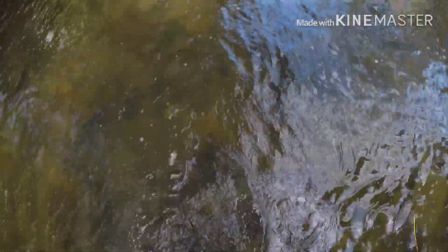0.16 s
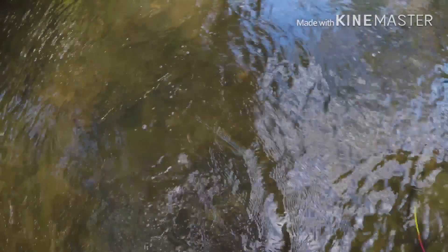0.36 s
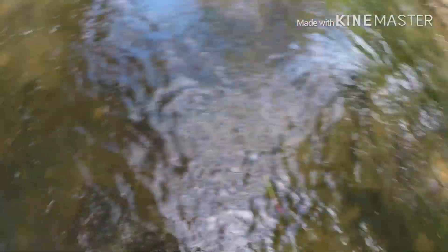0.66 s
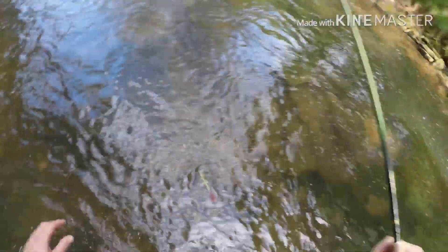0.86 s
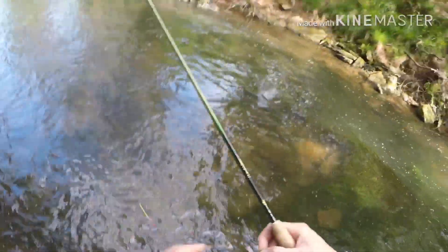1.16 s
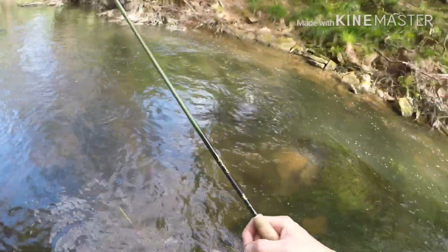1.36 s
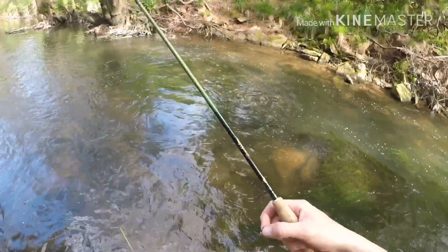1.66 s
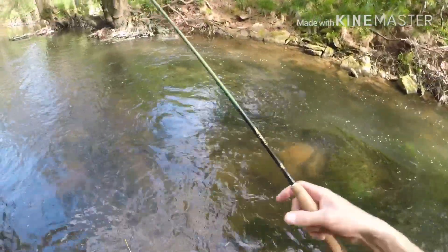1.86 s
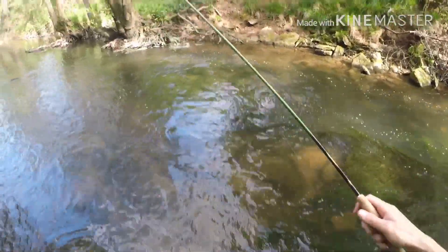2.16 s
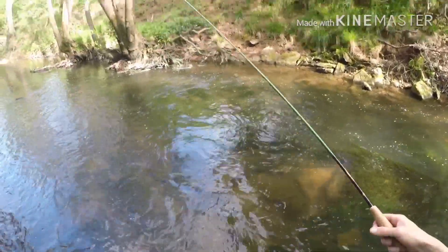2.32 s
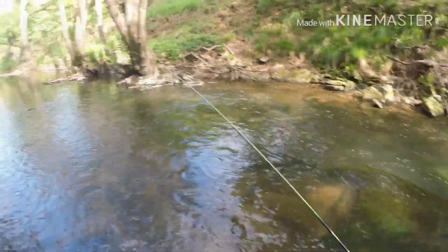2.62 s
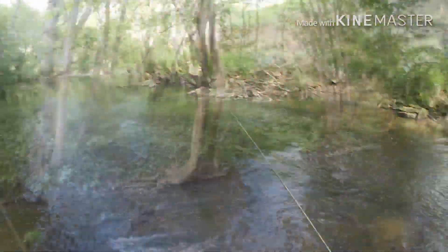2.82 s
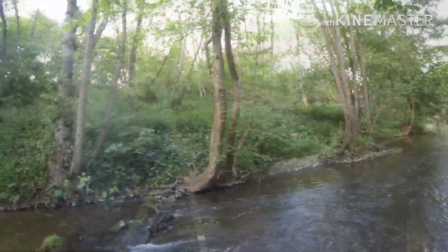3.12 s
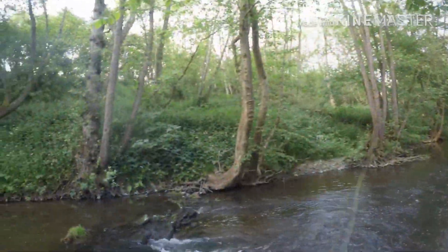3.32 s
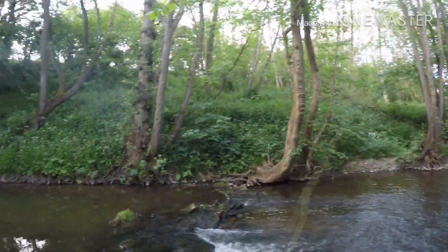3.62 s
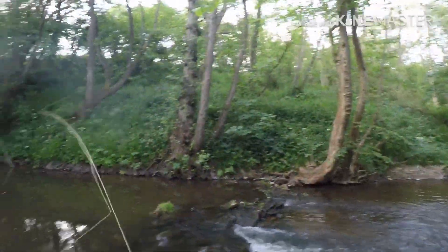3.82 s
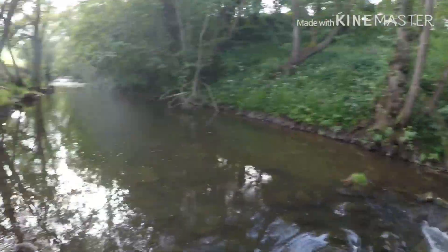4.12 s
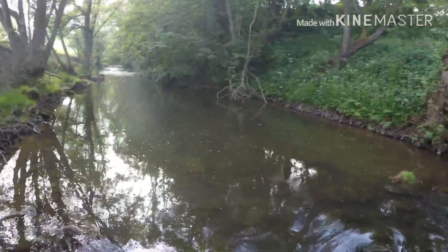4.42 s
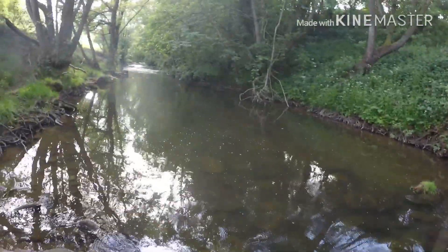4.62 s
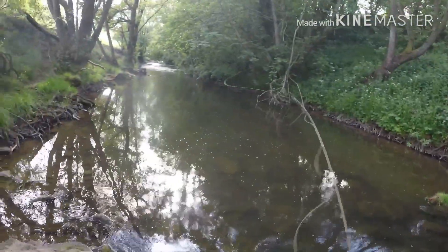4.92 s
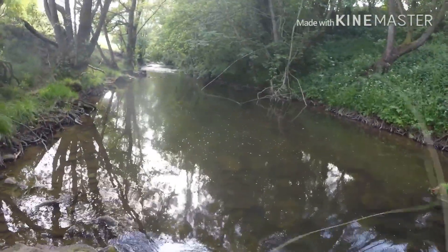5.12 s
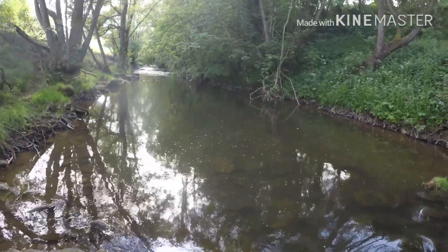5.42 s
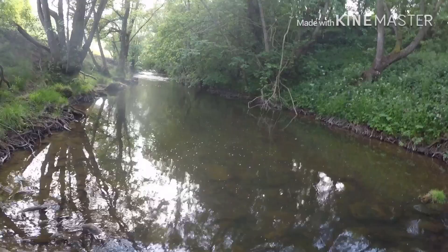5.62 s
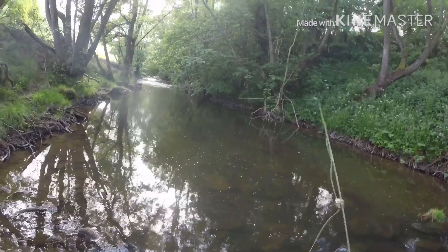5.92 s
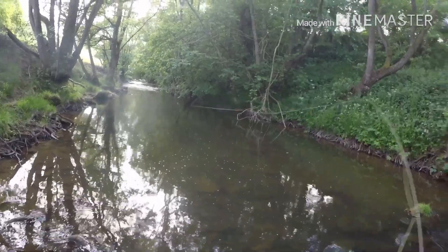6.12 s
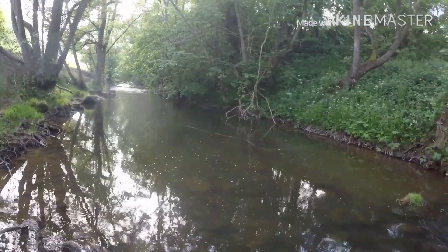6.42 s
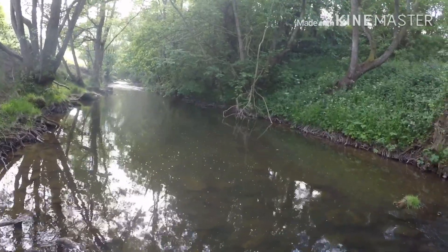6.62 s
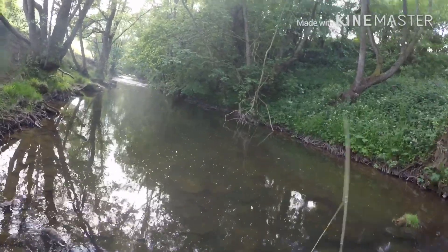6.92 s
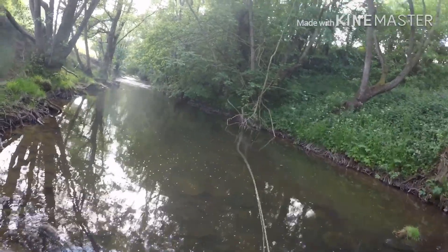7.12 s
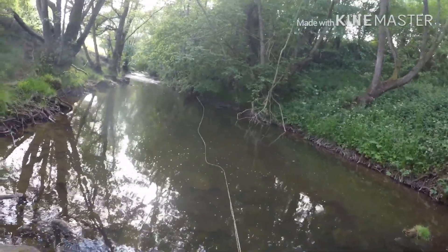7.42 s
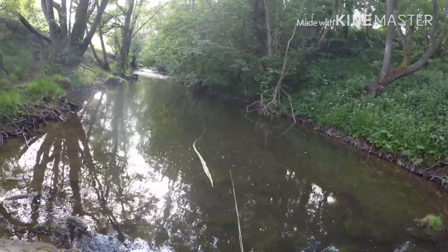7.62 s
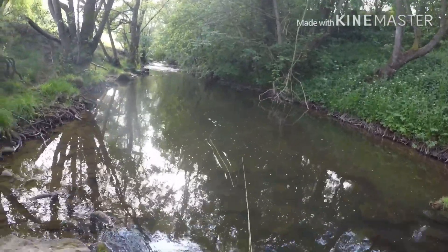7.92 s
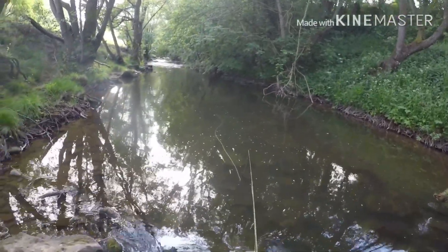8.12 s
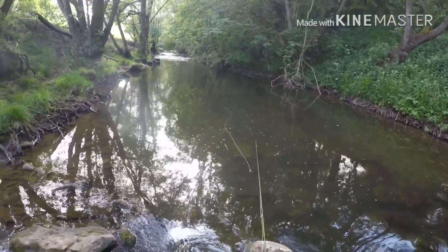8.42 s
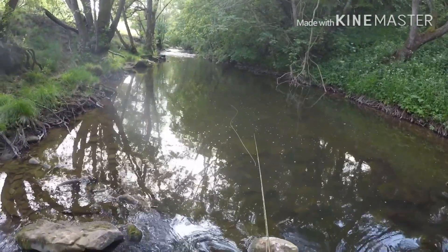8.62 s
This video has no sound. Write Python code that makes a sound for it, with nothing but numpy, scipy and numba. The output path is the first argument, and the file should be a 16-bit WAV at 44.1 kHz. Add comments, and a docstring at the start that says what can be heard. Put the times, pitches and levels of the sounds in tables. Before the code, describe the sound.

From 0 s a shallow river churns beside a pool: a dense, low-mid roar of bubbles with fine babble and a weak hiss, and a very faint low rumble of moving air. Deep gulps and small plinks show at 0.1-0.45 s, more gulps near 0.7-0.8 s. The tone brightens slightly from 0.7 to 1.3 s as the microphone turns. A far bird gives short thin notes near 1.8 kHz at 1.26 and 2.03 s, then a longer falling whistle at 2.17-2.75 s, cut off by an abrupt level drop at 2.57 s. The water swells back smoothly to full by 3.55 s, now a riffle. Until about 9 s the rush stays steady, with gentle surges, hollow plops, deep gulps, brief sliding gurgles, light droplet ticks and a small spray puff at 4.9 s. Close, outdoor, wide stereo, mostly louder right.

```python
"""A shallow river churns and hisses over stones beside a pool, where a far bird whistles.
Then the level drops and swells back beside the riffle, with gulps, sliding gurgles and ticks.
Bubbles are damped sines over filtered noise; gurgles and whistles are sliding tones; droplets are noise ticks.
Two close microphone ports hear much of the low water in nearly opposite phase, mostly louder on the right.
A faint low rumble of moving air lies underneath."""
import sys
import numpy as np
from scipy import signal
from scipy.fft import rfft, irfft, next_fast_len
from scipy.io import wavfile
from scipy.ndimage import uniform_filter1d, minimum_filter1d, map_coordinates
from numba import njit

SR = 44100
rng = np.random.default_rng(int(sys.argv[2]) if len(sys.argv) > 2 else 0)


def to_wav(sig):
    """Store sig (one row per channel, or 1-D mono) as 16-bit WAV at the path in sys.argv[1].

    Samples outside -1..1 are clipped; the rate is SR.
    """
    pcm = np.clip(np.atleast_2d(sig), -1, 1) * 32767
    pcm = np.round(pcm).astype(np.int16)
    wavfile.write(sys.argv[1], SR, pcm.T)  # frames by channels


N = 386301

# Levels in the tables are those before the ports and the final gain control.
# Colour of the water. Each row: frequency in Hz, pool strength in dB, riffle strength in dB (both relative).
WATER_COLOUR = [(127.3, -16, -25.5), (174, 0.5, -6.5), (223, 1, -3), (328, -1.5, -3), (433, -1, 1.5),
                (568, -0.3, 0.94), (789, -6.5, -4.5), (1167, -18, -14), (1460, -23, -19.5),
                (1950, -29, -24), (2320, -39.5, -32), (2720, -41, -37.5), (3200, -37.5, -37.5),
                (3560, -38.5, -35.5), (4070, -45.5, -44.5), (5640, -42.5, -40.5), (7620, -39.5, -37.5),
                (10200, -45, -43.5), (11900, -50.5, -51), (13500, -60, -58)]
# The two spots, pool then riffle. Each row: level of the churn in dB, of the babble in dB, of the spray in dB.
SPOT_LEVELS = [(-14.5, -30, -43), (-16.5, -29.5, -43.5)]
# Typical random drift in dB, in the order churn, babble, spray.
LAYER_DRIFT_DB = (.6, .25, .2)
# Waves breaking harder or softer. Each row: middle in seconds, churn lift in dB, spray lift in dB.
WAVE_SURGES = [(.22, -0.5, 1), (2.3, 0.8, 1), (3.65, 0.8, 1), (4.25, 0, .8), (4.9, 0.8, .8), (7.17, 0.7, 1),
               (7.75, 1, 1.3), (8.5, 0, 1)]
SURGE_S = 0.25  # time from the middle until the lift falls to about a third
# The microphone swings toward the white water, once per spot. Each row: start in seconds, end in seconds.
MICROPHONE_TURNS = [(.66, 1.27), (3.25, 4.25)]
# Colour while it is turned away. Each row: frequency in Hz, pool change in dB, riffle change in dB.
TURNED_AWAY = [(700, 0.5, 0.5), (1400, -2, -2), (2210, -2, -1.5), (3400, -5.5, 1.5), (5600, -4, -1),
               (10000, -7.5, -5.5)]
# Small splashes that throw up spray. Each row: middle in seconds, lift in dB.
SPRAY_SPLASHES = [(3.93, 1.5), (4.92, 3.5), (5.82, 1.5), (6.04, 1), (7.34, 1)]
SPLASH_S = .03  # time from the middle until the lift falls to about a third
# Single bubbles, from gulps to small plinks. Each row: start in seconds, first pitch in Hz, level in dB.
SINGLE_BUBBLES = [(.118, 624, -13), (.13, 3300, -37), (.131, 1840, -28), (.146, 3480, -42),
                  (.157, 3200, -36), (.181, 1836, -24), (.225, 2450, -31.5), (.312, 2250, -30),
                  (.32, 169, -6), (.354, 2260, -33), (.446, 4200, -37), (.718, 330, -12), (.787, 343, -8),
                  (1.748, 189, -14), (3.602, 918, -12), (3.814, 1200, -15.5), (3.958, 1590, -19.5),
                  (4.063, 412, -6.5), (4.084, 2720, -28), (4.098, 2720, -28), (4.126, 1210, -13),
                  (4.249, 877, -12), (4.284, 3560, -35), (4.46, 808, -11), (4.612, 192, -9.5),
                  (4.943, 296, -10), (5.038, 193, -9), (5.149, 936, -7), (5.334, 800, -10),
                  (5.569, 818, -12), (5.897, 953, -9), (5.899, 1710, -23), (6.464, 248, -7.5),
                  (6.857, 680, -10), (6.981, 1410, -20), (7.143, 3300, -34), (7.215, 154.5, -6),
                  (7.459, 1630, -24), (7.487, 3400, -35), (7.885, 832, -12), (8.181, 680, -8.5),
                  (8.504, 205, -11), (8.593, 1060, -13)]
# Sliding notes of air cavities. Each row: start in seconds, length in seconds, first pitch in Hz,
# last pitch in Hz, level in dB; the pitches are those before the bulge and waver.
GURGLE_NOTES = [(3.79, .08, 385, 460, -23), (4.26, 0.085, 440, 399, -22), (4.75, .09, 470, 492, -22.5),
                (4.97, .1, 488, 540, -22.5), (5.188, 0.072, 350, 270, -21), (5.24, .06, 560, 574, -19.5),
                (5.66, .11, 320, 469, -23), (5.891, .08, 470, 412, -20.5), (6.21, 0.082, 440, 500, -21),
                (6.884, 0.0677, 235, 430, -18.5), (6.96, .11, 320, 440, -21.5), (7.06, .075, 420, 250, -23),
                (7.159, 0.072, 290, 412, -23), (7.535, .06, 248, 484, -20), (7.59, 0.073, 417.5, 438, -18),
                (8.55, 0.088, 188.4, 311, -20.5)]
GURGLE_ARCH = 0.072  # share by which the pitch bulges upward midway
# Droplets landing close by. Each row: start in seconds, level in dB before the band filter.
DROPLET_TICKS = [(1.795, -24), (2.876, -31), (2.972, -27), (3.076, -30), (3.129, -23), (3.379, -33),
                 (4.005, -27), (5.182, -28), (5.317, -27), (5.438, -28), (5.819, -25), (5.913, -27.5),
                 (6.023, -29), (6.827, -28), (6.987, -25), (7.33, -27), (7.344, -24.5), (7.497, -24),
                 (7.835, -27), (7.894, -24), (8.048, -28), (8.557, -29)]
# The bird's thin notes. Each row: start in seconds, length in seconds, top pitch in Hz, level in dB.
BIRD_NOTES = [(1.262, 0.076, 1814, -35.5), (2.035, 0.087, 1810, -33.5), (2.166, 0.58, 1820, -37.5)]
SCOOP_HZ, SCOOP_S = 55, 0.023  # a note starts this far below its top and climbs at this pace
HOLD_S, SAG_HZ_PER_S = 0.1, 600  # after the hold, the pitch sags
TREES_T60_S, TREES_DB = 0.19, -12  # time for the trees' answer to fade by 60 dB, and its level
# Air stirring on the ports beside the pool. Each row: time in seconds, rumble level in dB.
AIR_RUMBLE = [(0.05, -46), (0.35, -54), (.65, -46), (1.15, -45), (2.35, -59)]
CALM_DB = -71  # typical rumble beside the riffle
# The microphone pair. Each row: frequency in Hz, left minus right in dB, left lead in radians,
# likeness of the two sides from 0 to 1.
PORT_PAIR = [(129, -4, 1.4, 0.9), (222, -5.5, -0.9, 1), (332, -10.5, -1, 0.95), (457, -15.5, -2, 1),
             (595, -10, -3, 1), (842, -3.5, -3.5, 0.96), (1173, -2, -3.5, 0.93), (2040, -2.5, -4.5, 0.83),
             (2520, -0.5, -4.5, 0.4), (2730, -1, -3, 0.27), (3310, -4.5, -4.5, 0.5),
             (3750, -10.5, -5.5, 0.65), (4440, -0.5, -9, 0.1), (5430, -5.5, -8.5, 0.34),
             (6940, -0.3, -9, 0.51), (7600, -1.2, -9.5, 0.24), (9150, 0, -11, 0.67), (11000, -2, -12, 0.24),
             (12500, -4.5, -18, 0.3)]
DROP_S, BACK_S, FULL_S = 2.572, 2.6, 3.55  # the level drops, the swell's ramp begins, full level
FADE_POWER = 1.11  # bend of the swell
TOP_HZ = 13550  # nothing is left from here up


def amp(db):
    """Turn decibels into a gain."""
    return 10 ** (np.asarray(db) / 20)


def unit(x):
    """Scale x to an average (rms) strength of 1."""
    return x / np.sqrt(np.mean(x ** 2) + 1e-20)


def along(rows, hz):
    """Read each column after the frequency, on a log frequency axis."""
    f, *columns = np.transpose(rows)
    return [np.interp(np.log(hz + 1), np.log(f), column) for column in columns]


def wobble(rate):
    """A smooth random curve through `rate` random points a second."""
    points = rng.standard_normal(int(N * rate / SR) + 4)
    return map_coordinates(points, [np.arange(N) * rate / SR])


def smooth(x, size):
    """Take two running means in a row."""
    return uniform_filter1d(uniform_filter1d(x, size=size), size=size)


def spectrum(x):
    """The frequencies and the spectrum of x, padded with silence."""
    length = 2 * next_fast_len(N // 2 + SR // 10, real=True)
    return np.fft.rfftfreq(length, 1 / SR), rfft(x, length)


def filtered(x, response):
    """Multiply the spectrum of x by a gain for each frequency."""
    hz, z = spectrum(x)
    return irfft(z * response(hz))[..., :N]


def band(hz, low_hz, high_hz, order=10):
    """A band-pass gain; neighbouring bands add up to nearly even power."""
    low_side = 1 + (low_hz / (hz + 1)) ** (2 * order)
    high_side = 1 + (hz / high_hz) ** (2 * order)
    return (low_side * high_side) ** -.5


def rush(patchy_db, size):
    """Two unrelated noises share patches of random gain across time and pitch."""
    z = signal.stft(rng.standard_normal((2, N)), nperseg=size)[2]
    across_pitch = uniform_filter1d(rng.standard_normal(z.shape[1:]), size=5, axis=0)
    patches = uniform_filter1d(across_pitch, size=9, axis=1)
    patchy = z * amp(patchy_db * unit(patches))
    return unit(signal.istft(patchy, nperseg=size)[1][:, :N])


@njit
def ring(times, pitches, gains, cycles, rise, onset):
    """Bubbles are soft-starting, damped sines that rise in pitch as they near the surface."""
    out = np.zeros((2, N))
    for i in range(len(times)):
        start = int(times[i] * SR)
        life = cycles[i] * SR / pitches[i]  # in samples
        for k in range(max(0, min(int(1.5 * life), N - start))):
            age = k / life
            turns = k * pitches[i] / SR
            wave = np.sin(2 * np.pi * turns * (1 + rise * age / 2))
            v = wave * np.exp(-3 * age) * (1 - np.exp(-turns / onset))
            out[0, start + k] += gains[0, i] * v
            out[1, start + k] += gains[1, i] * v
    return out


def cloud(rate, low_hz, high_hz, cycles, rise, onset, spread_db):
    """A random crowd of bubbles, `rate` a second, has even power per Hz; a few are much louder."""
    when, place, strength, bearing, life = rng.random((int(rate * N / SR), 5)).T
    hz = low_hz * (high_hz / low_hz) ** place
    gain = hz * amp(-spread_db * np.log(strength + .01))
    angle = 2 * np.pi * bearing
    gains = gain * np.array([np.cos(angle), np.sin(angle)])  # random share in the two parts of the field
    return unit(ring(when * N / SR, hz, gains, cycles * (.5 + life), float(rise), float(onset)))


def river():
    """Churn, babble and spray take each spot's colour and surges, duller while the microphone is turned away."""
    t = np.arange(N) / SR
    low_db, spray_db = sum(np.outer(lifts, np.exp(-((t - s) / SURGE_S) ** 2)) for s, *lifts in WAVE_SURGES)
    # Each layer: sound, surge in dB, low edge in Hz, high edge in Hz
    layers = [(churn(), low_db, 128, 1000),
              (babble(), (low_db + spray_db) / 2, 1000, 2500),
              (spray(), spray_db, 2500, SR / 2)]
    out = np.zeros((2, N))
    for spot, present in enumerate([t < DROP_S, t >= DROP_S]):
        water = np.zeros((2, N))
        for (layer, surge_db, low_hz, high_hz), db, drift_db in zip(layers, SPOT_LEVELS[spot], LAYER_DRIFT_DB):
            colour = lambda hz: amp(along(WATER_COLOUR, hz)[spot]) * band(hz, low_hz, high_hz, order=14)
            level_db = db + surge_db + drift_db * wobble(3.397)
            water += amp(level_db) * unit(filtered(layer, colour))
        dull = filtered(water, lambda hz: amp(along(TURNED_AWAY, hz)[spot]))
        facing = np.interp(t, MICROPHONE_TURNS[spot], [0, 1])
        out += present * (facing * water + (1 - facing) * dull)
    return out


def churn():
    """Pockets of air folded under behind the stones ring low and glide upward over a noise roar."""
    pockets = cloud(rate=450, low_hz=125.35, high_hz=1101.6, cycles=19.05, rise=0.357, onset=1.1, spread_db=0.5)
    roar = unit(filtered(rng.standard_normal((2, N)), lambda hz: band(hz, 60, 1170)))
    return unit(pockets + amp(1.5) * roar)


def babble():
    """A dense crowd of small bubbles pings as wavelets break, merging into a fine wash."""
    pings = cloud(rate=4200, low_hz=854.0, high_hz=2802, cycles=14.2, rise=0.081, onset=.9, spread_db=2.5)
    wash = unit(filtered(rush(patchy_db=.8, size=256), lambda hz: band(hz, 760, 2600)))
    tremble_db = 0.24 * wobble(14) + 1.2 * wobble(60)
    return unit(pings + amp(-.5) * wash) * amp(tremble_db)


def spray():
    """Foam crackles as tiny bubbles over a hiss, trembles finely and puffs up with each splash."""
    t = np.arange(N) / SR
    splash_db = sum(db * np.exp(-((t - s) / SPLASH_S) ** 2) for s, db in SPRAY_SPLASHES)
    crackle = cloud(rate=2200, low_hz=2310, high_hz=12900, cycles=4.9, rise=0.086, onset=0.31, spread_db=5.5)
    hiss = rush(patchy_db=0.96, size=256)
    tremble_db = 0.42 * wobble(17) + 0.63 * wobble(70)
    return unit(hiss + amp(-11.5) * crackle) * amp(splash_db + tremble_db)


def gulps():
    """The largest and nearest bubbles stand out singly; the higher ones ring for more cycles."""
    s, hz, db = np.array(SINGLE_BUBBLES, float).T.copy()
    gains = np.array([amp(db), np.zeros(len(s))])  # all in the common part of the field
    rings = ring(s, hz, gains, cycles=9 + hz / 70, rise=0.066, onset=0.56)
    return filtered(rings, lambda f: band(f, 154, 5000, order=14))


def gurgle():
    """Air cavities behind the stones shrink or widen, so each note slides along a shallow arch."""
    out, t = np.zeros((2, N)), np.arange(N) / SR
    flutter = amp(1.5 * wobble(45))
    waver = 1 + .012 * wobble(130)
    for start, length, first_hz, last_hz, db in GURGLE_NOTES:
        now = (t >= start) & (t < start + length)
        progress = (t[now] - start) / length
        arch = np.abs(np.sin(np.pi * progress))
        slide_hz = first_hz + (last_hz - first_hz) * progress
        hz = slide_hz * (1 + GURGLE_ARCH * arch) * waver[now]
        wave = unit(np.sin(2 * np.pi * np.cumsum(hz) / SR))
        out[0, now] += amp(db) * flutter[now] * np.sqrt(arch) * wave
    return filtered(out, lambda f: band(f, 165, 900))


def droplets():
    """Each near droplet lands with one very short tick of fading noise."""
    out, t = np.zeros((2, N)), np.arange(SR // 100) / SR
    for s, db in DROPLET_TICKS:
        start = round(s * SR)
        fade = amp(db - 60 * t / 0.0029)  # falls by 60 dB in 2.9 ms
        out[:, start:start + len(t)] += fade * rng.standard_normal((2, len(t)))
    return filtered(out, lambda hz: band(hz, 3200, 9500, order=4))


def bird():
    """A far bird gives two short notes, then a long falling whistle, blurred by the scattering trees."""
    out, t = np.zeros((2, N)), np.arange(SR // 4) / SR
    for start, length, top_hz, db in BIRD_NOTES:
        age = np.clip(np.arange(N) / SR - start, 0, length)
        scoop = SCOOP_HZ * np.exp(-age / SCOOP_S)
        sag = SAG_HZ_PER_S * np.maximum(age - HOLD_S, 0)
        out += tone(start, length, top_hz - scoop - sag, db, waver=.005, flutter_db=2)
    trees = rng.standard_normal((2, len(t))) * amp(-60 * t / TREES_T60_S)
    answer = signal.oaconvolve(out[:1], trees / np.linalg.norm(trees), axes=1)[:, :N]
    return out + amp(TREES_DB) * answer


def tone(start, length, hz, db, waver, flutter_db):
    """A slightly unsteady tone from one direction swells and fades in one arch."""
    progress = np.clip((np.arange(N) / SR - start) / length, 0, 1)
    arch = np.sqrt(np.abs(np.sin(np.pi * progress)))
    unsteady_hz = hz * (1 + waver * wobble(130))
    wave = unit(np.sin(2 * np.pi * np.cumsum(unsteady_hz) / SR))
    return np.array([arch * amp(db + flutter_db * wobble(45)) * wave, np.zeros(N)])


def breeze():
    """Air stirring on the ports makes a faint low noise, mostly common to both."""
    t = np.arange(N) / SR
    common, apart = filtered(rng.standard_normal((2, N)), lambda hz: band(hz, 30, 130, order=4))
    pair = np.array([common + 0.16 * apart, common - 0.19 * apart])
    times, levels_db = np.transpose(AIR_RUMBLE)
    pool_db = np.interp(t, times, levels_db) + 1.3 * wobble(6.2)
    riffle_db = CALM_DB + 3 * wobble(8)
    return amp(np.where(t < DROP_S, pool_db, riffle_db)) * unit(pair)


def ports(field):
    """Two parts of the sound field reach the ports with a balance, lead and likeness set by frequency."""
    hz, (common, apart) = spectrum(field)
    balance_db, lead, coherence = along(PORT_PAIR, hz)
    turn = np.arccos(np.clip(coherence, 0, 1)) / 2  # mixing angle that gives this likeness
    right_gain = np.sqrt(2 / (1 + amp(balance_db) ** 2))
    left_gain = right_gain * amp(balance_db) * np.exp(1j * lead)
    left = left_gain * (np.cos(turn) * common + np.sin(turn) * apart)
    right = right_gain * (np.cos(turn) * common - np.sin(turn) * apart)
    return irfft(np.array([left, right]))[:, :N]


def scene():
    """Water and bird pass through the microphone pair, over a little moving air."""
    water = river() + gulps() + gurgle() + droplets()
    return ports(water + bird()) + breeze()


def gain_control(x, target_db, strength):
    """The gain leans against swells and lulls of the short-term level."""
    level = np.sqrt(np.abs(smooth(np.mean(x ** 2, axis=0), size=1800)) + 1e-9)
    return x * (amp(target_db) / level) ** strength


def limiter(x, ceiling_db):
    """The gain eases down just around peaks above the ceiling."""
    needed = np.minimum(1, amp(ceiling_db) / (np.abs(x).max(axis=0) + 1e-9))
    return x * smooth(minimum_filter1d(needed, size=1600), size=800)


def record(dry):
    """Swells and peaks are held down, the level drops and swells back, and the top treble is cut."""
    held = limiter(gain_control(dry, target_db=-15.5, strength=0.42), ceiling_db=-2.5)
    t = np.arange(N) / SR
    swell = np.clip((t - BACK_S) / (FULL_S - BACK_S), .039, 1) ** FADE_POWER  # never quite silent
    fader = np.where(t < DROP_S, 1, swell)
    return filtered(held * smooth(fader, size=240), lambda hz: hz < TOP_HZ)


dry = scene()
out = record(dry)
to_wav(out)
```